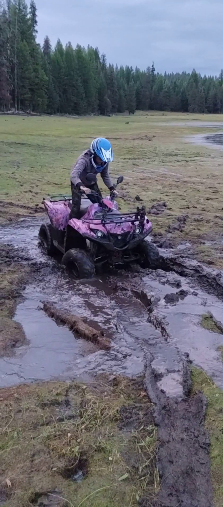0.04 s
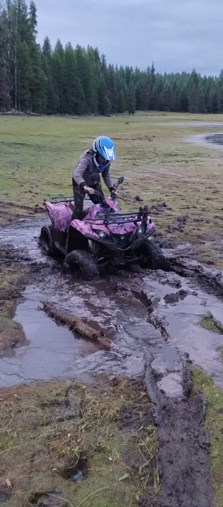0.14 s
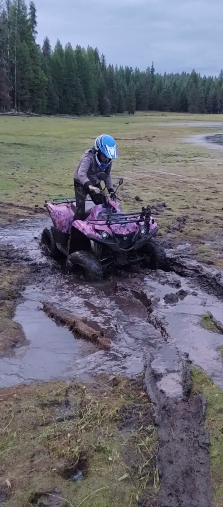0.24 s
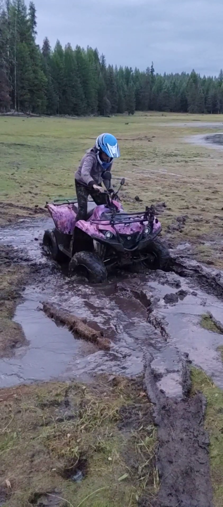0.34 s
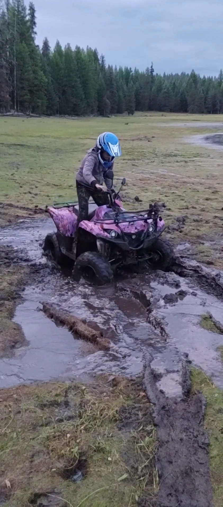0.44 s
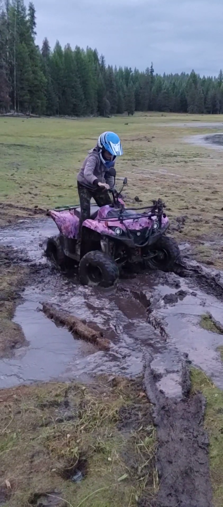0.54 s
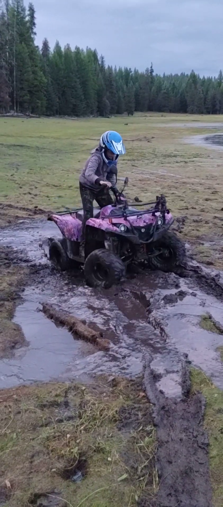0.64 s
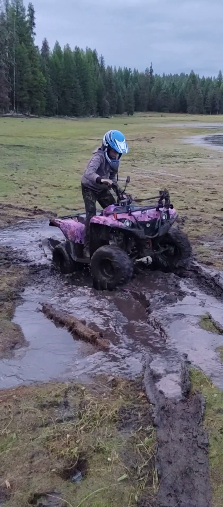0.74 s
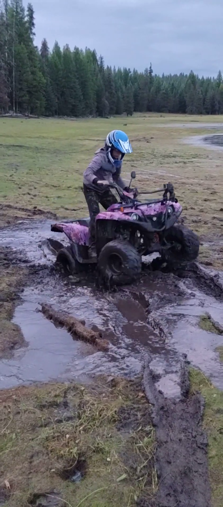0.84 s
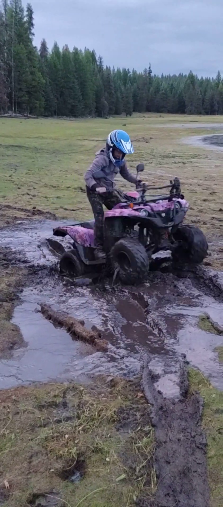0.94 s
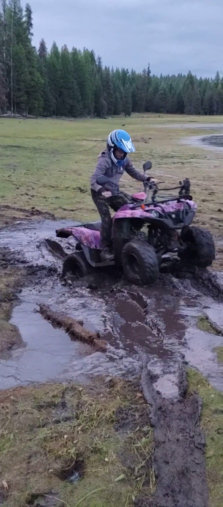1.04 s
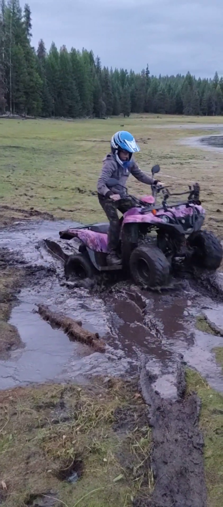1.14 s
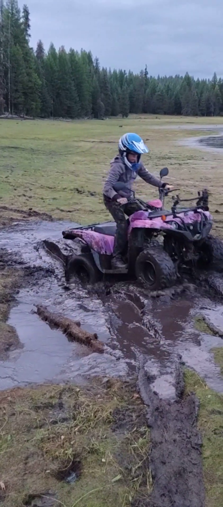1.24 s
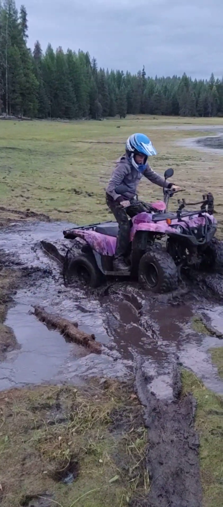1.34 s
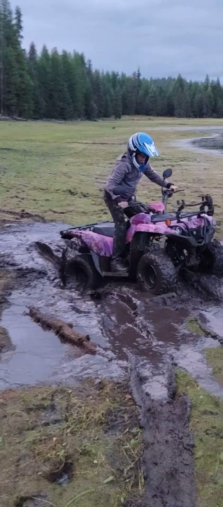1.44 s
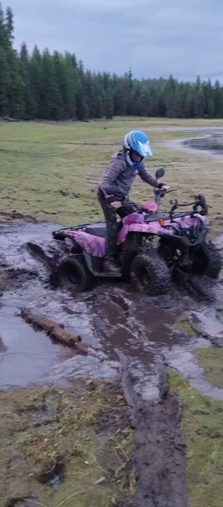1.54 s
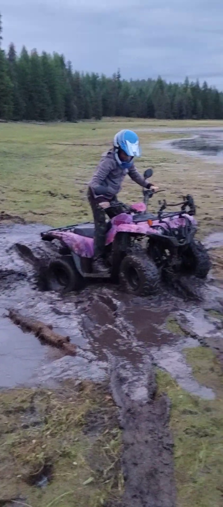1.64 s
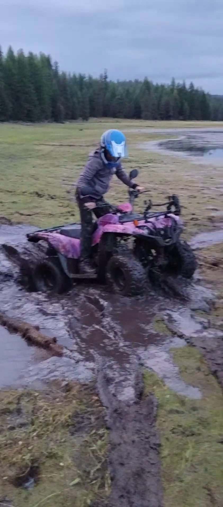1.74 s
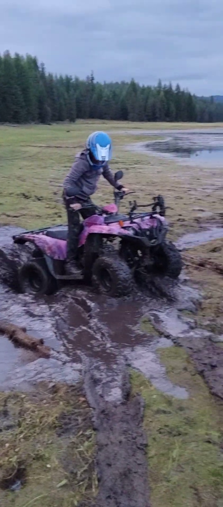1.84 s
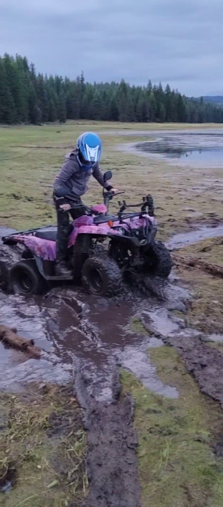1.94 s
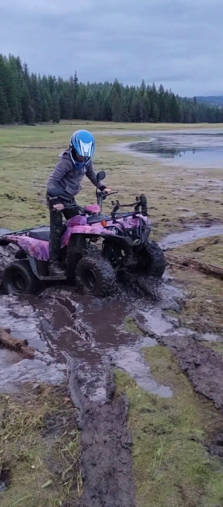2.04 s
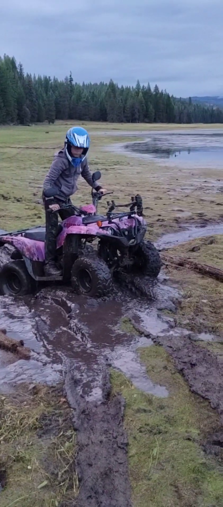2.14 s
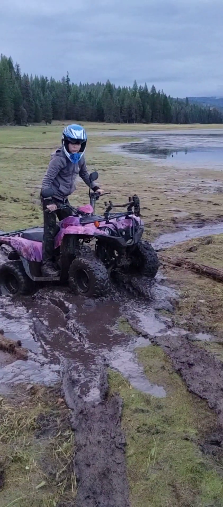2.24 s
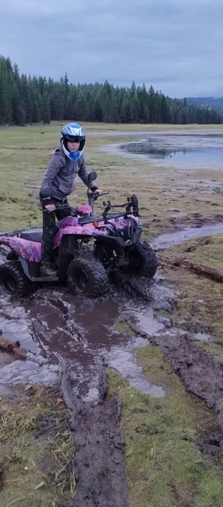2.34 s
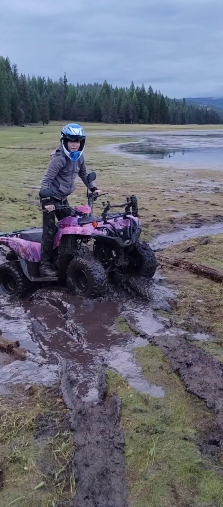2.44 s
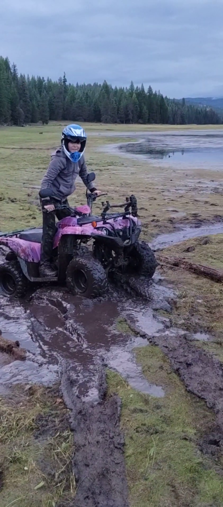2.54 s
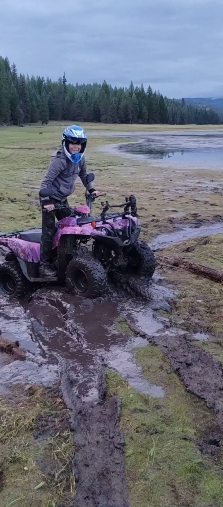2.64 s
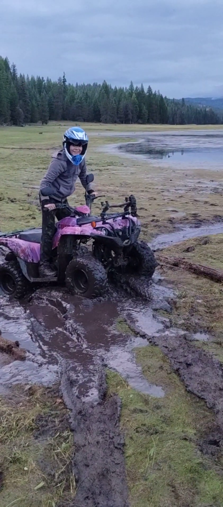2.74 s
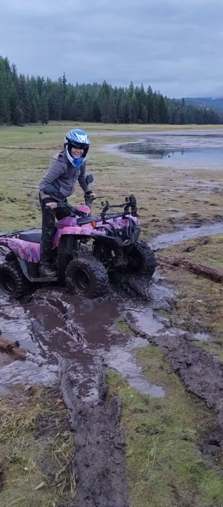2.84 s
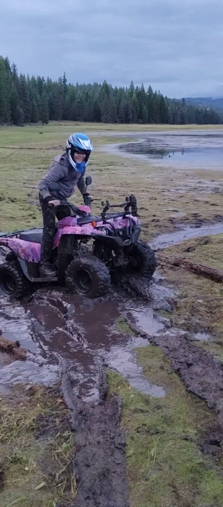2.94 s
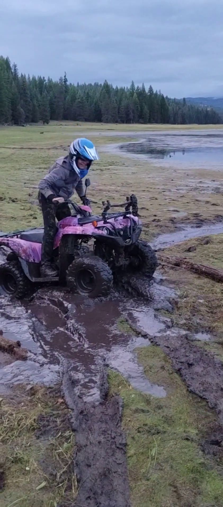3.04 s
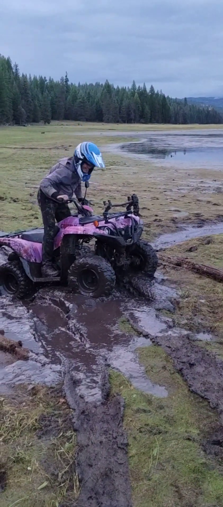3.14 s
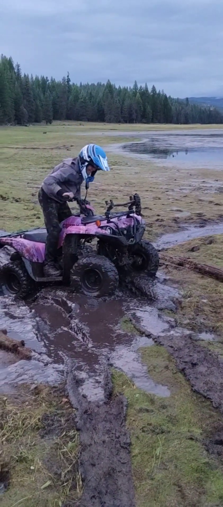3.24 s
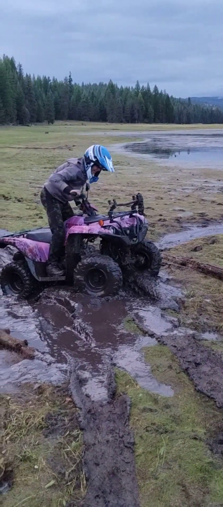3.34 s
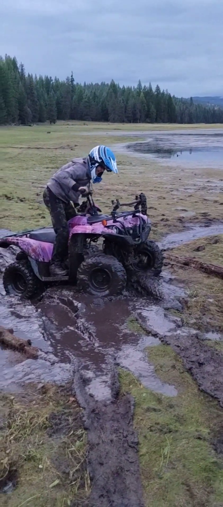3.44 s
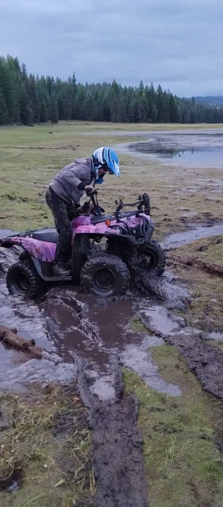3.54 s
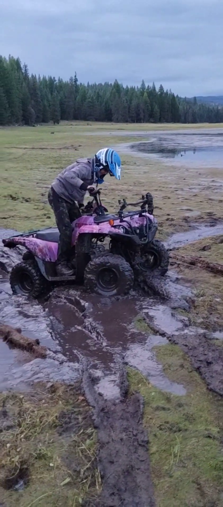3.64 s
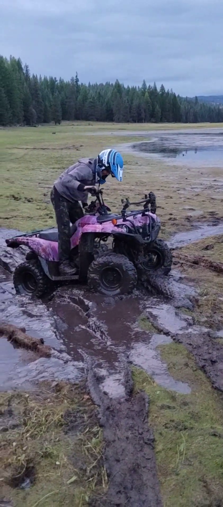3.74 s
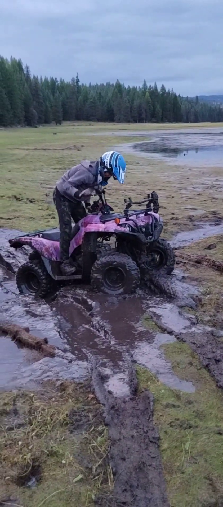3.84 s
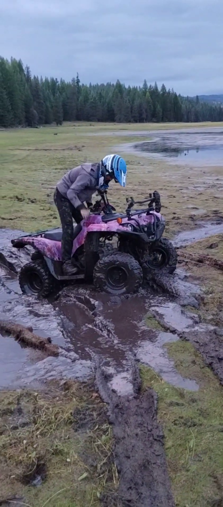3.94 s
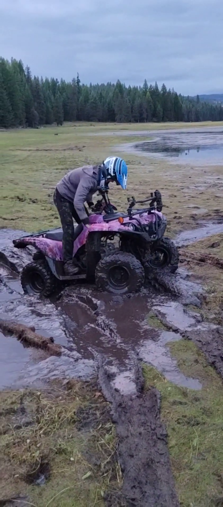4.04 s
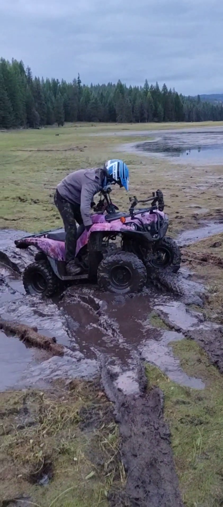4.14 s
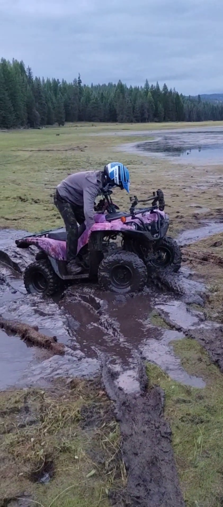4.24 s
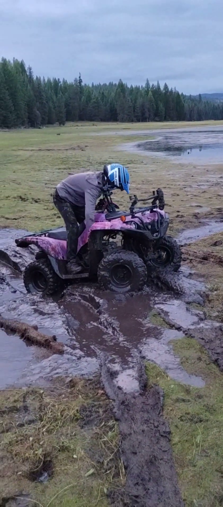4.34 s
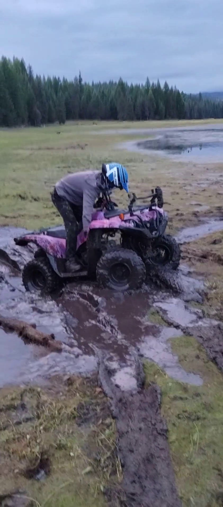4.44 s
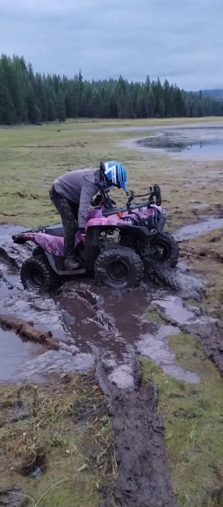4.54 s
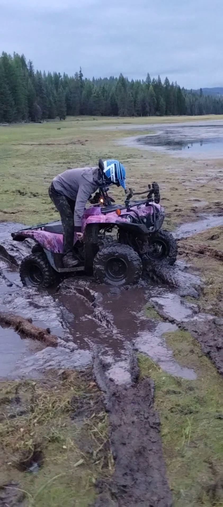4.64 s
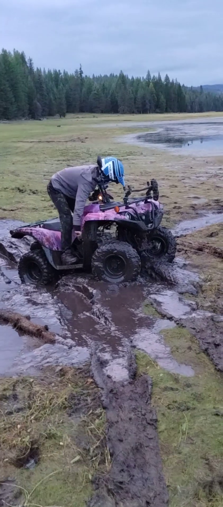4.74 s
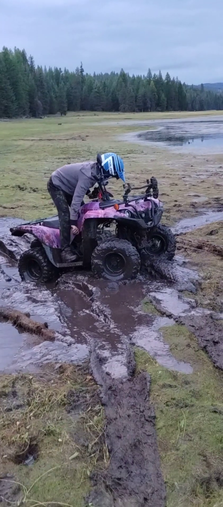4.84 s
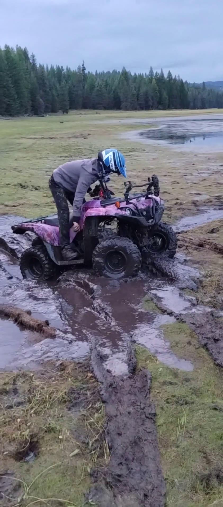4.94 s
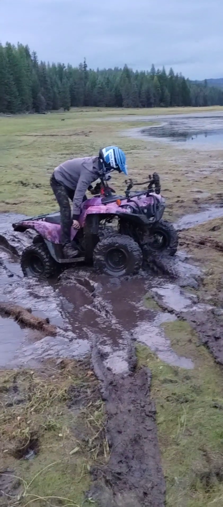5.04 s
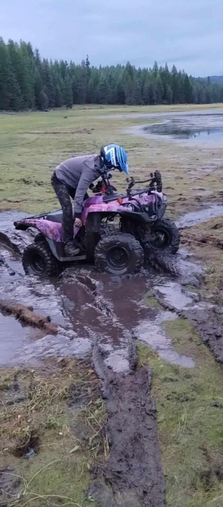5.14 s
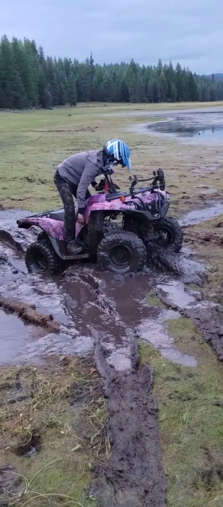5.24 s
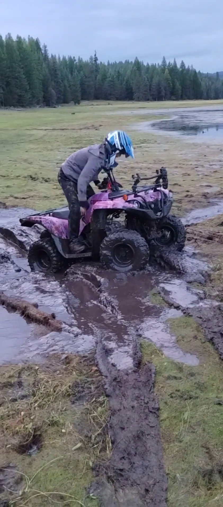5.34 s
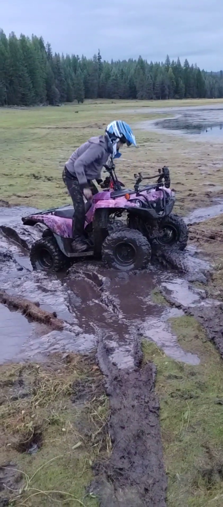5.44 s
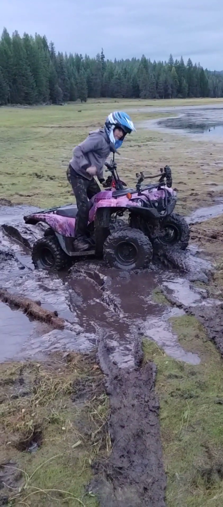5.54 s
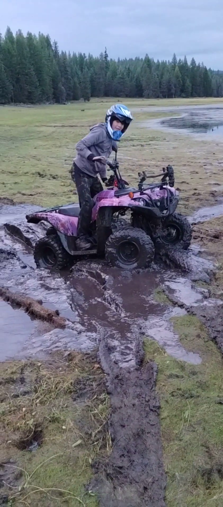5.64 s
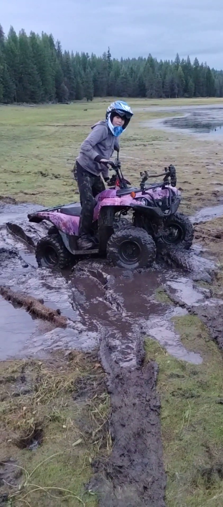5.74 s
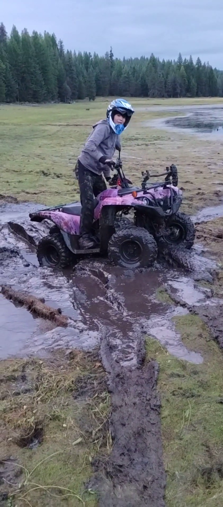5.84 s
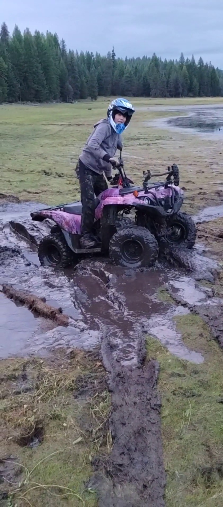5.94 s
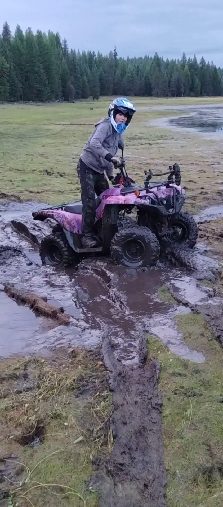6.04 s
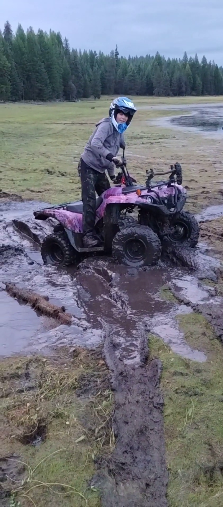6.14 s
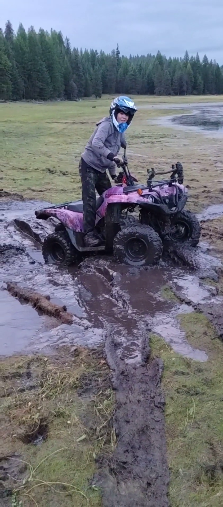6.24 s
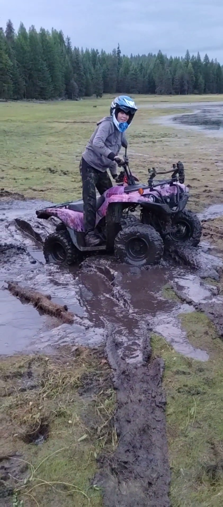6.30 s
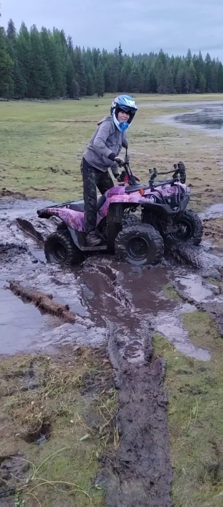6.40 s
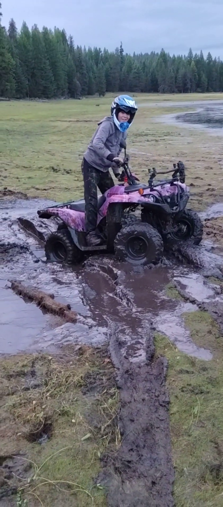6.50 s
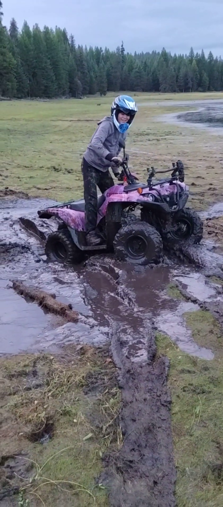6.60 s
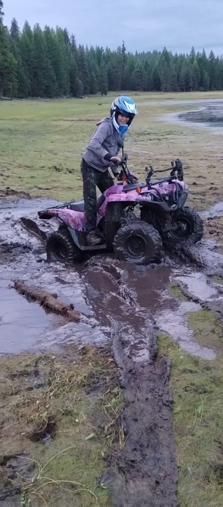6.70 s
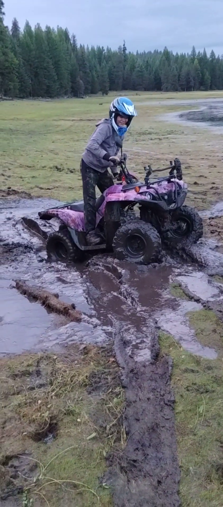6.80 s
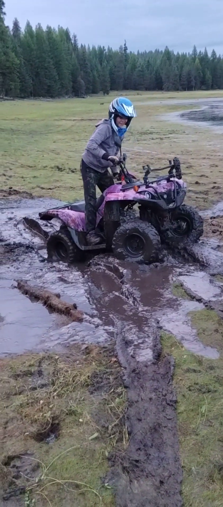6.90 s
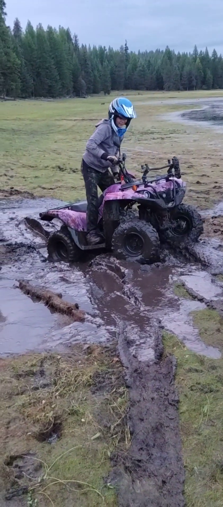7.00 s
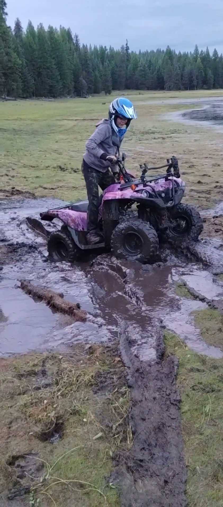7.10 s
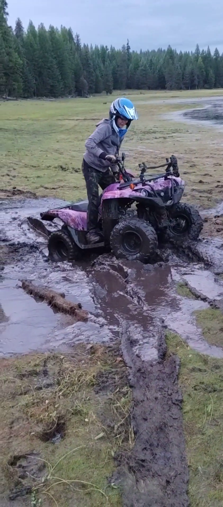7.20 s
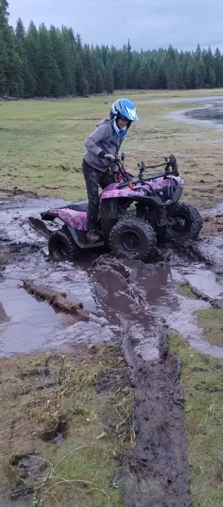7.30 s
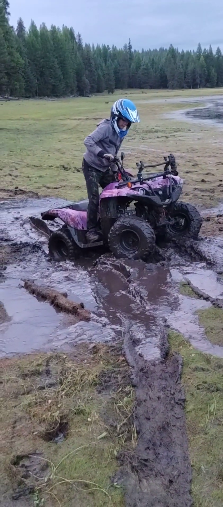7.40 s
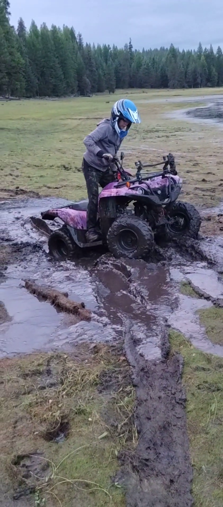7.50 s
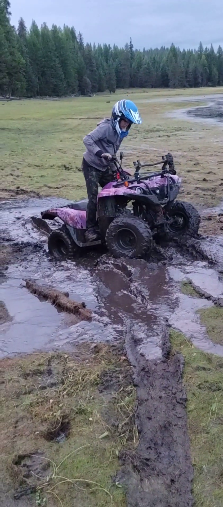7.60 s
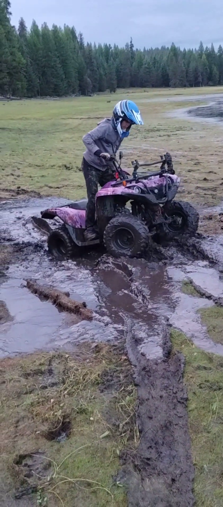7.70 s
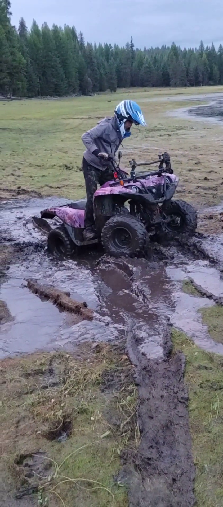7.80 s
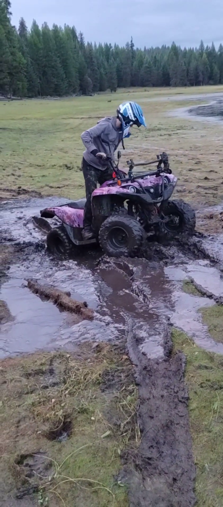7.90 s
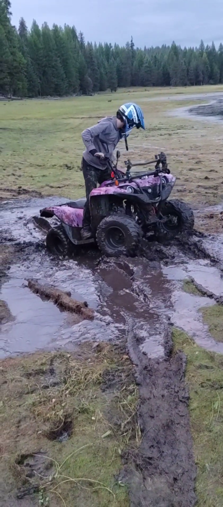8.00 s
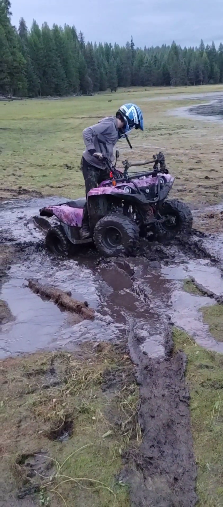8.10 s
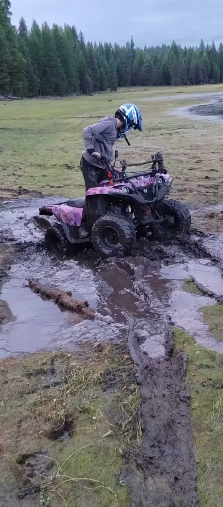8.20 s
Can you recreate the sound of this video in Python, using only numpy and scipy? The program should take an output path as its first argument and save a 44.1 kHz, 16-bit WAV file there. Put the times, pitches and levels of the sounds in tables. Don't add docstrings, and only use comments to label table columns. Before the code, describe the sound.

A small single-cylinder quad engine, a few metres away in an open muddy meadow, climbs through a long raspy rev, then drops to a lumpy idle. A brief soft blip follows, then idling with bright lever knocks and ticks. A hard metallic clank comes as it revs again, then coasts with two short throttle stabs. Phone pickup, dry, thin bass, brighter on the left.

```python
import sys
import numpy as np
from scipy import signal
from scipy.fft import rfft, irfft
from scipy.io import wavfile
from scipy.ndimage import uniform_filter1d

SR = 44100
rng = np.random.default_rng(int(sys.argv[2]) if len(sys.argv) > 2 else 0)


def makeup_ratio(level_db):
    decades = np.asarray(level_db, float) / 20
    return 10 ** decades


def dump(signal):
    limited = np.clip(np.atleast_2d(signal).T, -1, 1)
    pcm = np.round(limited * 32767).astype(np.int16)
    wavfile.write(sys.argv[1], SR, pcm)


N = 364248
T = np.arange(N) / SR
HZ = np.fft.rfftfreq(N, 1 / SR)


def evened(x):
    return x / np.sqrt(np.mean(x ** 2) + 1e-20)


def steadied(x):
    return x / np.sqrt(uniform_filter1d(x ** 2, size=8000))


def curve(points):
    return np.interp(T, *np.transpose(points))


def read(points, hz):
    f, value = np.transpose(points)
    return np.interp(np.log(hz + 1), np.log(f + 1), value)


def ring(x, hz, width):
    r = np.exp(-np.pi * width / SR)
    return signal.lfilter([1 - r, 0, -(1 - r) * r], [1, -2 * r * np.cos(2 * np.pi * hz / SR), r * r], x)


def slide(x, hz, width):
    turn = np.exp(2j * np.pi * np.cumsum(hz) / SR)
    r = np.exp(-np.pi * width / SR)
    at_zero = signal.lfilter([(1 - r) ** 2], [1, -2 * r, r * r], x / turn + 1e-18)
    return 2 * (turn * at_zero).real


def tone(hz):
    return np.sin(2 * np.pi * np.cumsum(hz) / SR)


def wander(count):
    once = uniform_filter1d(rng.standard_normal(N), count)
    return evened(uniform_filter1d(once, count))


def during(spans, edge_s=0.016):
    return sum(np.clip(np.minimum(T - a, b - T) / edge_s + .5, 0, 1) for a, b in spans)


# pitch_hz, likeness (0 to 1)
PORT_LIKENESS = [(100, 1), (380, 0.23), (700, 0.84), (1300, 0.9), (2400, 0.12), (4400, 0.51), (8000, 0.29),
                 (15000, 0.066)]


def pair(gate, points):
    a, b = rfft(gate * rng.standard_normal((2, N)))
    same = np.clip(read(PORT_LIKENESS, HZ), 0, 1)
    z = np.array([a, same * a + np.sqrt(1 - same ** 2) * b])
    return evened(irfft(z * makeup_ratio(read(points, HZ)), N))


# time_s, rate_cycles_per_s
SPEED = [(0.0, 29.823), (0.267, 32.518), (0.845, 44.266), (1.307, 45.024), (1.694, 48.011), (1.862, 48.072),
         (2.362, 21.699), (2.553, 17.527), (3.093, 14.889), (3.485, 16.772), (3.868, 23.198),
         (4.365, 18.504), (5.213, 15.848), (6.135, 16.022), (6.399, 30.774), (6.788, 40.59),
         (6.966, 42.954)]
# open_s, shut_s
STABS = [
    (7.219, 7.412),
    (7.731, 7.96),
]


def crank():
    coast_per_s2, stab_per_s2 = 37.138, 61.41
    rate = curve(SPEED) - coast_per_s2 * np.maximum(T - SPEED[-1][0], 0)
    rate = rate + stab_per_s2 * sum(np.clip(T - a, 0, b - a) for a, b in STABS)
    start_turns, lead_s = -.172, .0039
    return rate, start_turns + np.cumsum(rate) / SR + lead_s * rate


# open_s, shut_s
REVS = [
    (-1, 1.9),
    (3.3, 3.9),
    (6.14, 7.0),
]


def throttle_open(edge_s=0.016):
    return during([*REVS, *STABS], edge_s)


def cycle_sizes(turns, start, spread_db):
    return makeup_ratio(spread_db * rng.standard_normal(400))[(turns - start + 2).astype(int)]


def burst(turns, start, width, spread_db):
    u = (turns - start) % 1 / width
    return cycle_sizes(turns, start, spread_db) * np.minimum(2.5 * u, 1) * np.exp(-u)


def meadow_air():
    colour = [(20, -2), (60, 0), (300, -38), (2000, -3), (16000, -7)]  # pitch_hz, level_db
    return makeup_ratio(-59) * pair(np.ones(N), colour)


# start_s, level_db, centre_hz, t60_s
KNOCKS = [
    (2.439, -38, 1620, 0.041),
    (3.216, -36, 1750, 0.05),
    (4.53, -26, 4540, 0.074),
    (4.677, -26.5, 8800, 0.066),
    (4.721, -24.5, 3380, 0.094),
    (4.812, -27, 8300, 0.13),
    (4.916, -26, 8500, 0.094),
    (4.941, -21.5, 4470, 0.072),
    (6.4003, -8.5, 7300, 0.13),
    (6.5732, -19, 1980, 0.038),
]
# pitch_hz, level_db, t60_s
CLANK = [(2095, -18, 0.17), (4317, -18, 0.05), (4360, -28, 5.0), (6560, -1.5, 0.066), (7950, -6, 0.1),
         (8800, 1, 0.043), (8800, -21, 0.083), (10500, -7, 0.069)]
# start_s, length_s, from_hz, to_hz, level_db
SQUEAKS = [
    (4.565, .065, 1330, 1330, -43),
    (4.812, .045, 1340, 1340, -46),
    (2.625, .03, 800, 2000, -44),
    (2.439, .007, 2300, 1400, -25),
]


def knocks():
    out, t = np.zeros((2, N)), T[:4000]
    for s, db, hz, t60 in KNOCKS:
        noise = rng.standard_normal((2, len(t)))
        noise[1] = noise[0] + 0.79 * noise[1]
        scrape = evened(ring(noise, hz, 0.21 * hz) + 0.34 * noise)
        hit = scrape * np.minimum(t / 0.0036, 1) * makeup_ratio(-60 * t / t60)
        if db > -25:
            metal = sum(makeup_ratio(d - 60 * t / r) * np.sin(2 * np.pi * f * t) for f, d, r in CLANK)
            hit = hit + makeup_ratio(-2.0) * metal
        out[:, round(s * SR):][:, :len(t)] += makeup_ratio(db - 7.5) * hit
    for s, length, from_hz, to_hz, db in SQUEAKS:
        hz = np.geomspace(from_hz, to_hz, round(length * SR))
        out[:, round(s * SR):][:, :len(hz)] += makeup_ratio(db) * np.hanning(len(hz)) * tone(hz)
    return out


GEAR_ORDERS = (28.3, 56.6)
# low_db, high_db
GEARS_DB = (-50.5, -52)
# pitch_hz, level_db
GEARBOX = [(400, -9), (650, -5), (800, -9), (960, 0), (1090, -15), (1250, -22), (1700, -8), (2100, 1),
           (2400, -11)]
# from_s, to_s, low_gear_db, high_gear_db
DRIVE = [
    (0, .4, -7, -4),
    (.4, 2.1, -8, -14),
    (2.2, 2.7, 4, -2),
    (3.75, 4.4, 3, -12),
    (6.38, 6.7, -1, -5),
    (6.7, 7.03, -6, -5),
    (7.03, 7.3, 5, 0),
    (7.3, 7.44, -4, -5),
    (7.42, 7.7, 3, 0),
    (8.08, 8.3, 7, -2),
]


def gears():
    rate, turns = crank()
    swing = .02 * np.sin(2 * np.pi * (turns - .1)) + .011 * wander(count=200)
    surge = 1 + (16 / rate) ** .5 * swing
    throb = 1 + .68 * np.sin(2 * np.pi * (turns - .12))
    out = np.zeros(N)
    for k, (order, free_db) in enumerate(zip(GEAR_ORDERS, GEARS_DB)):
        drive_db = sum(row[2 + k] * during([row[:2]], edge_s=0.11) for row in DRIVE)
        hz = order * rate * surge
        uneven_db = 3.4 * wander(count=300)
        load_db = .8 * (rate - 16)
        level_db = free_db + drive_db + load_db + read(GEARBOX, hz) + uneven_db
        out += makeup_ratio(level_db) * throb * tone(hz)
    return out


# from_s, to_s, pitch_hz, level_db (over the hiss)
BUZZES = [(0, 0.45, 1736, -11), (0.8, 0.847, 1700, -0.5), (0.8, 1.22, 3345, -11.5), (4, 4.7, 940, -12),
          (2.5, 3.7, 965, -6), (0.5, 2.1, 3350, -15), (7.5, 7.4, 1625, -3), (6.7, 7.3, 3500, -11),
          (6.87, 7.5, 4500, -11), (8, 9, 3345, -13), (8, 7.9, 3400, -2.5)]


def panel_buzz(valves):
    shaken = (1 + valves) * rng.standard_normal(N)
    return sum(makeup_ratio(db) * during([(a, b)], edge_s=0.094) * evened(ring(shaken, hz, 17))
               for a, b, hz, db in BUZZES)


# pitch_hz, level_db
HISS = [(1590, -70), (2700, 0.5), (3180, 10), (3400, 7.5), (3610, 7), (3920, 9.5), (4280, 5), (4860, 9.5),
        (5900, 5.5), (8500, 15), (9640, 12.5), (12100, -8), (15100, -61), (16000, -59)]
# pitch_hz, width_hz, level_db
COVERS = [(4690, 74, 1.5), (6240, 71, 3.5), (6620, 31, -7), (8070, 81, 8), (8540, 38, 7), (9100, 220, 8),
          (9630, 41, 3), (10400, 40, -4), (11760, 190, 0), (12200, 37, -7), (12800, 37, -4), (13300, 63, 1),
          (13700, 90, -10), (15000, 240, -22)]


def valve_hiss(valves, grit, rate):
    covers = sum(makeup_ratio(db) * evened(ring(valves * rng.standard_normal((2, N)), hz, width))
                 for hz, width, db in COVERS)
    covers_db = -11.5 + 11.5 * np.clip((30 - rate) / 10, 0, 1)
    return pair(valves * grit, HISS) + makeup_ratio(covers_db) * evened(covers)


# pitch_hz, level_db
RASP = [(600, -26), (900, -7), (1200, -6.5), (1700, -3), (1950, -5), (2250, -3), (2650, -8), (3400, -22)]
# pitch_hz, width_hz, level_db
CASING = [(955, 70, -1), (1670, 70, 0), (2280, 80, -2), (2800, 80, -8)]


def casing_rasp(valves, grit):
    walls = sum(makeup_ratio(db) * evened(ring(valves * rng.standard_normal(N), hz, width))
                for hz, width, db in CASING)
    return pair(valves * grit, RASP) + makeup_ratio(-13) * walls


# pitch_hz, level_db
RUSH = [(40, -29), (100, -24), (300, -13), (500, -15), (700, -10), (900, -13), (1100, -19.5), (1500, -26)]


def gas_rush(turns, smear):
    gas = steadied(.4 * smear + burst(turns, .06, .15, 2.5))
    return pair(gas, RUSH)


# time_s, level_db
EFFORT = [(0, -41.5), (.3, -36), (.84, -28.5), (1.49, -24.5), (1.77, -22.5), (2.0, -27.5), (2.25, -36),
          (2.51, -44.5), (3.04, -50), (3.66, -52), (3.84, -45.5), (4.4, -50), (6.14, -56.5), (6.4, -39.5),
          (6.92, -32), (7.2, -35), (7.7, -39.5), (8.26, -43)]


def noise_levels():
    rate, effort_db = crank()[0], curve(EFFORT)
    throttle = throttle_open(edge_s=0.021)
    middle = np.exp(-((rate - 28.6) / 11.8) ** 2)
    rush_db = effort_db - 6.5 + 6.5 * middle + 0.5 * throttle
    rasp_db = effort_db - 6 + 1.5 * middle + 1.5 * throttle
    return rush_db, rasp_db, effort_db + 0.5 * throttle


def clatter():
    rate, turns = crank()
    rush_db, rasp_db, hiss_db = noise_levels()
    smear = (rate / 30) ** 1.3
    valves = steadied(.45 * smear + burst(turns, .18, .2, 2.0) + 1.1 * burst(turns, .5, .14, 2.5))
    grit = makeup_ratio(1.1 * wander(count=40))
    rush = makeup_ratio(rush_db + 2.6) * gas_rush(turns, smear)
    rasp = makeup_ratio(rasp_db + 3.43) * casing_rasp(valves, grit)
    hiss = makeup_ratio(hiss_db - 0.5) * (valve_hiss(valves, grit, rate) + panel_buzz(valves))
    return rush + rasp + hiss


# pitch_hz, width_hz
SHADOWS = [(800, 120), (1260, 200), (2400, 110), (5300, 400), (7750, 700), (12450, 350), (14000, 350)]


def shaded(x):
    share = .8 * np.clip((30 - crank()[0]) / 8, .15, 1)
    for hz, width in SHADOWS:
        x = x - share * ring(x, hz, width)
    return x


# from_s, to_s
MISFIRES = [
    (2.3, 2.5),
    (2.585, 2.62),
    (4.14, 4.18),
    (8.12, 8.4),
]
# from_s, to_s
DIG = (.62, 1.9)


def surges():
    rate = crank()[0]
    throttle = throttle_open()
    overrun = np.clip(rate - 24.5, 0, 1)
    cut = (1 - throttle) * np.clip(overrun + during(MISFIRES), 0, 1)
    idle = 1 - throttle - cut
    dig = during([DIG], edge_s=.15)
    catch_s, fade_s = 2.5, 0.58
    catch = 1 + 2.2 * np.exp(-np.maximum(T - catch_s, 0) / fade_s)
    burn = 7.8 * (rate - 12.7)
    backflow = 0.88 * (rate - 3.5)
    blow = throttle * burn - cut * backflow + idle * 23.6 * catch
    push = throttle * burn * (0.71 - 0.74 * dig)
    push = push + idle * 3.6 * (rate - 11.5)
    push = push + cut * 277 * np.clip((rate - 18) / 8, .15, 1)
    suck = throttle * (2.5 * (rate - 11) + 61 * dig)
    suck = suck + cut * 9.2 + idle * 28.3 * np.sqrt(catch)
    return blow, push, -suck


# pitch_hz, width_hz, level_db
OVERTONES = [(324, 71, 2), (423.7, 77, 4.5), (459.3, 72, 3.5), (555, 76, -0.5), (636, 32, -12)]


def snap():
    rate, turns = crank()
    blow, push, _ = surges()
    fast = np.clip((rate - 24) / 20, 0, 1)
    heat = 1 + .22 * throttle_open() * fast - 0.13 * (blow < 0)
    load = (np.abs(blow) + 0.6 * push) ** 0.65 * (rate / 30) ** 1.19
    shut = np.clip((28 - rate) / 12, .25, .9)
    puffs = burst(turns, .04, .012 + .02 * shut, 1.5) - shut * burst(turns, .27, .03, 2.5)
    out = np.zeros(N)
    for k, (hz, width, db) in enumerate(OVERTONES):
        out += (-1) ** k * makeup_ratio(db) * slide(load * puffs, hz * heat, 1.12 * width)
    return makeup_ratio(-39) * out


# start_cycles, width_cycles (at 30 per s), speed_power (by which width follows speed)
SURGES = [
    (-0.00705, 0.0537, 1.18),
    (0.124, 0.0745, 0.72),
    (0.272, 0.0706, 1.0),
]
# pitch_hz, width_hz, level_db
PIPE = [(102.2, 37, 12), (153.5, 19.3, 13), (190, 23.7, 20.5), (217.4, 24.8, 20.5)]


def exhaust():
    rate, turns = crank()
    flow = np.zeros(N)
    for size, (start, width, power) in zip(surges(), SURGES):
        u = (turns - start) % 1 / (width * (rate / 30) ** power)
        change = np.gradient(u ** 3 * np.exp(-u)) * SR / 1e6
        flow += size * cycle_sizes(turns, start, .5) * change
    return makeup_ratio(1.5) * sum(makeup_ratio(db) * ring(flow, hz, width) for hz, width, db in PIPE)


def silenced(pipe):
    return pipe - 0.53 * ring(pipe, 269, 27)


def scene():
    body = shaded(clatter() + meadow_air())
    return silenced(exhaust() + snap()) + body + gears() + knocks()


# pitch_hz, left_minus_right_db
BALANCE_DB = [(60, 0.0), (92, 0.0), (140, 0.0), (210, -0.5), (330, 1.0), (500, 2.0), (770, 0.5),
              (1170, 1.5), (1790, -2.5), (2740, -0.5), (4190, 1.0), (6410, 7.0), (9810, 26.0),
              (15000, 13.0)]
# pitch_hz, level_db
BASS_CUT = [(20, 6), (40, -10), (50, -18), (64, -1), (75, -1)]


def two_ports(x):
    tilt = makeup_ratio(read(BALANCE_DB, HZ))
    left_lead_s = 3 / 44100
    left = 2 * tilt * np.exp(2j * np.pi * HZ * left_lead_s)
    ports = np.array([left, 2 + 0 * tilt]) / (1 + tilt)
    return irfft(rfft(x) * makeup_ratio(read(BASS_CUT, HZ)) * (HZ < 15800) * ports, N)


def top_cut(x):
    return signal.sosfilt(signal.butter(12, 16830, fs=SR, output="sos"), x)


def record(dry):
    headroom = 1.2
    limited = headroom * np.tanh(dry / headroom)
    thinned = signal.lfilter(*signal.butter(3, 70 / SR * 2, "high"), limited)
    mix = two_ports(thinned)
    return top_cut(mix)


dry = scene()
out = record(dry)
dump(out)
```